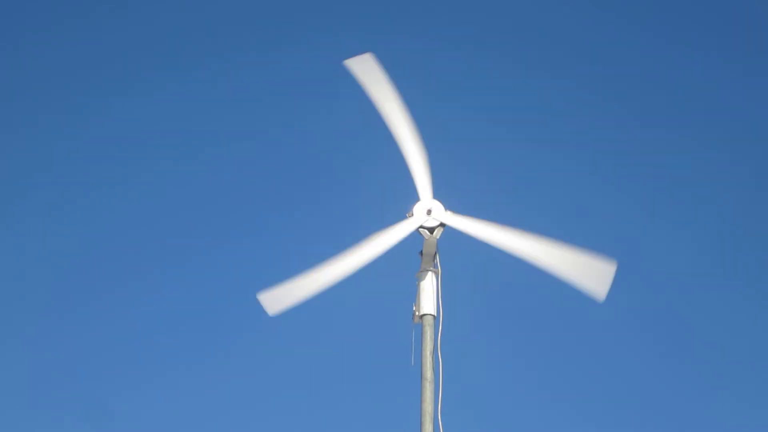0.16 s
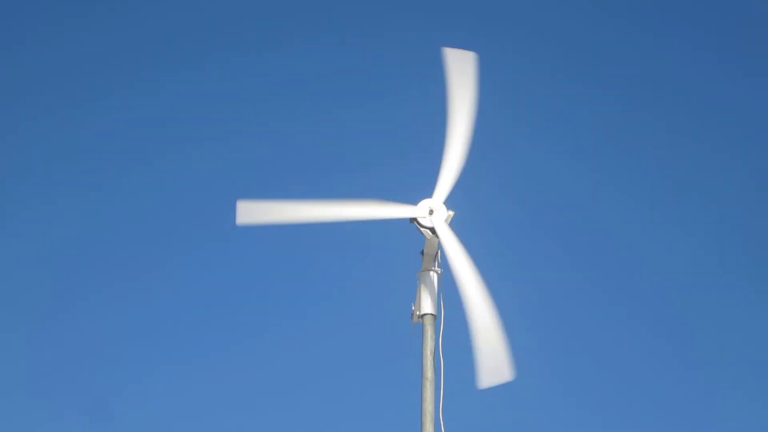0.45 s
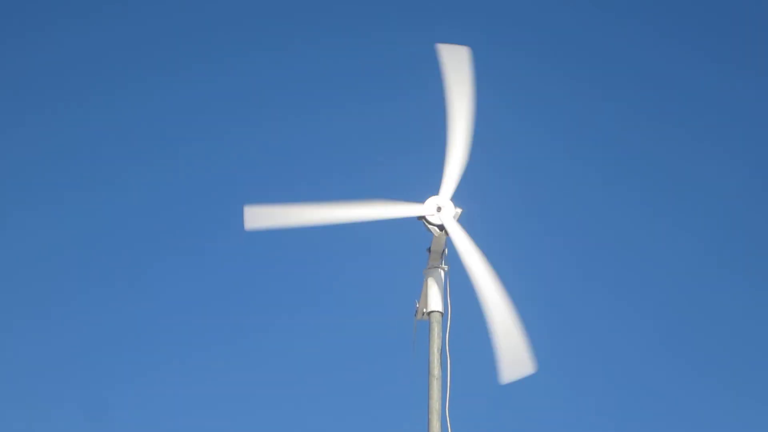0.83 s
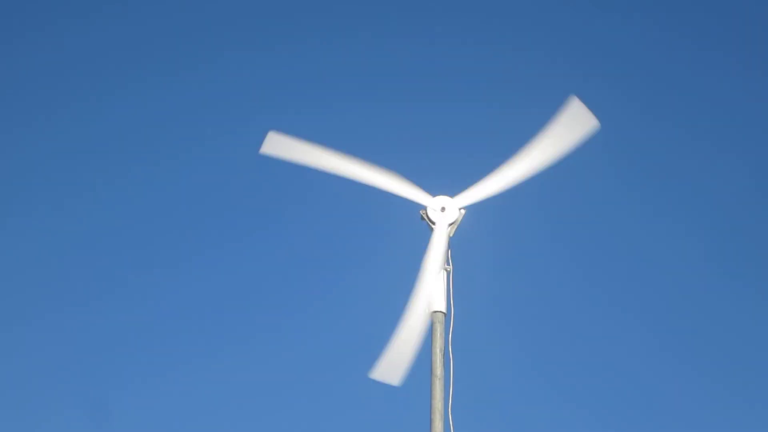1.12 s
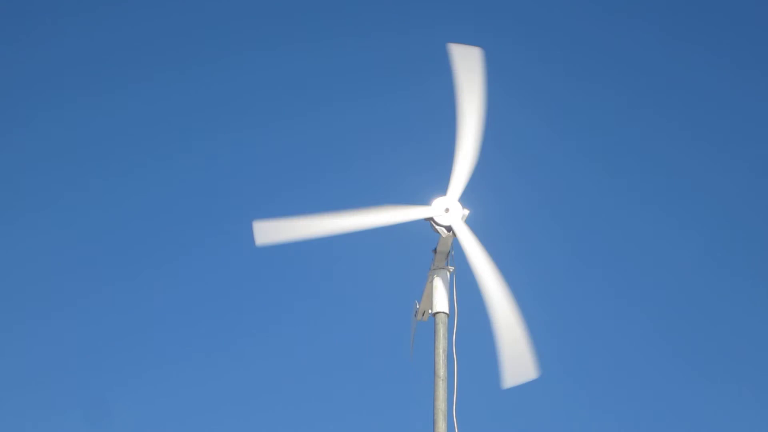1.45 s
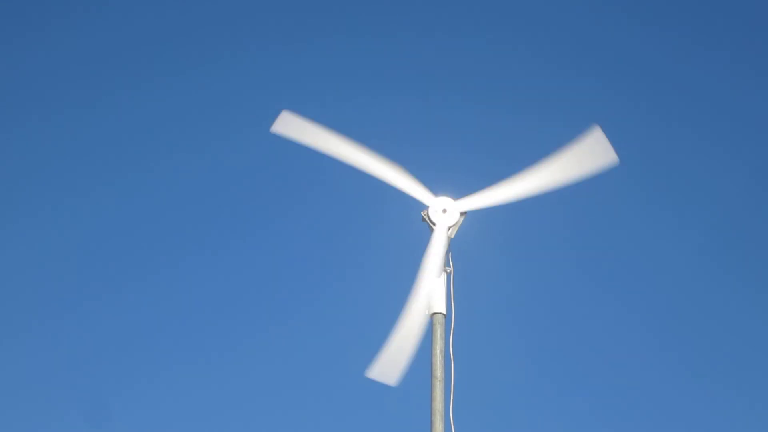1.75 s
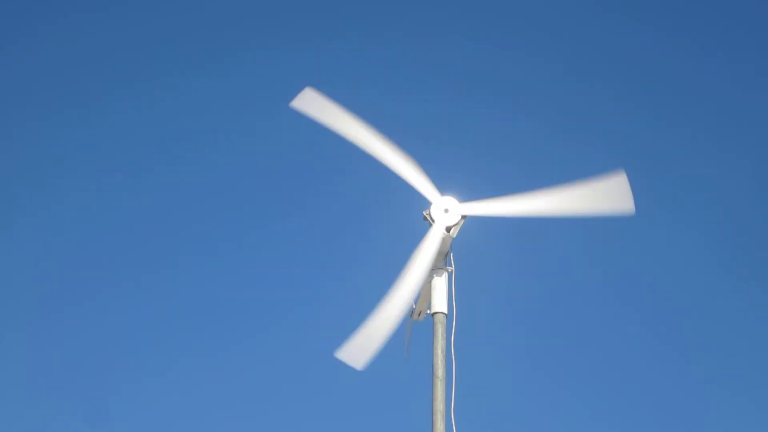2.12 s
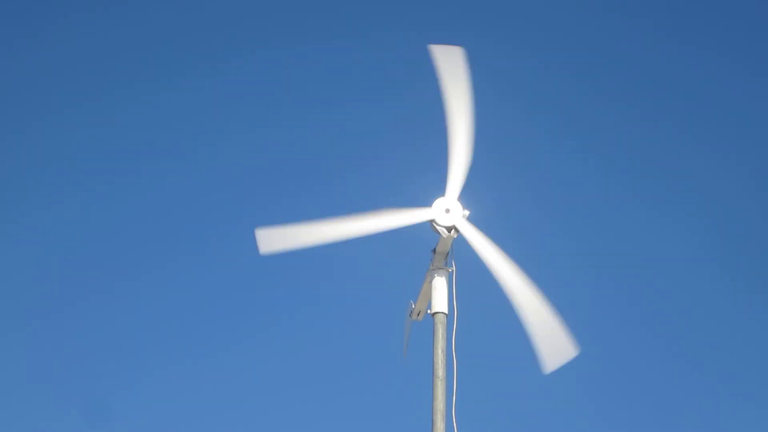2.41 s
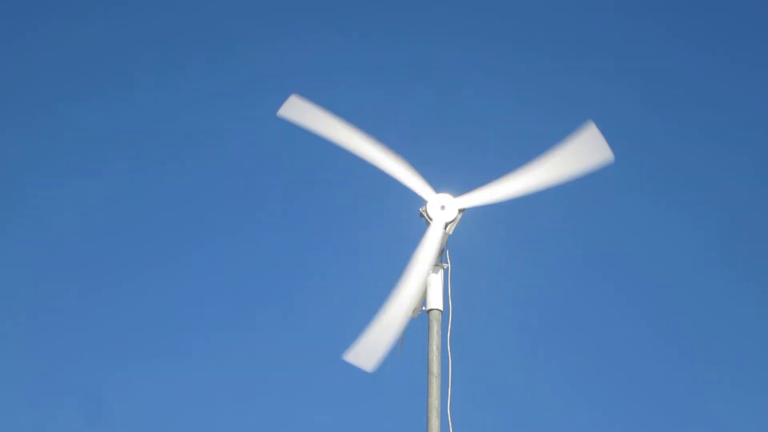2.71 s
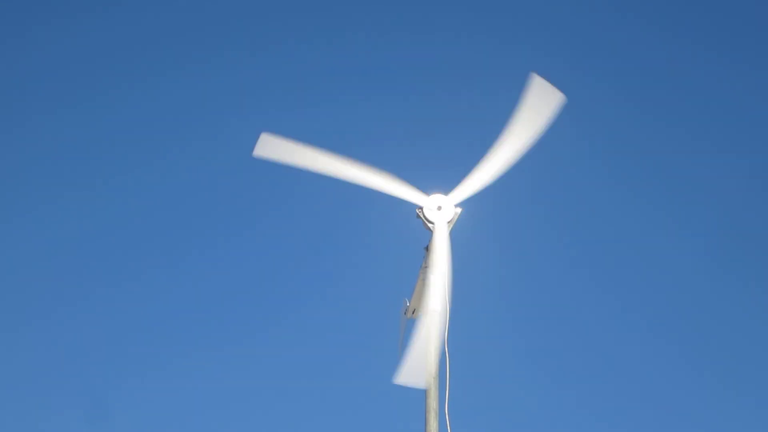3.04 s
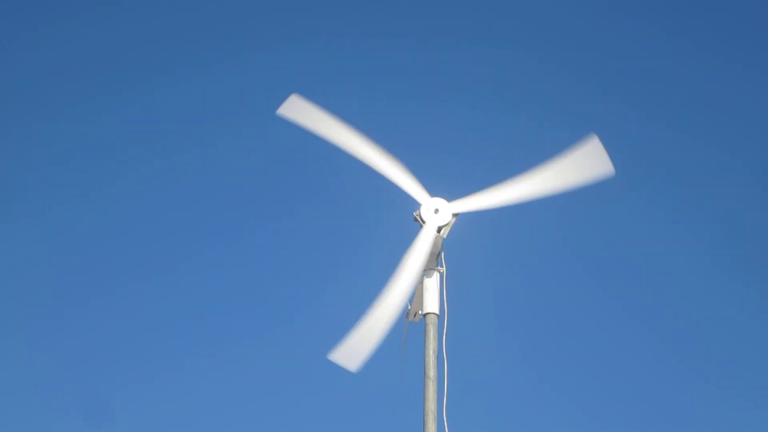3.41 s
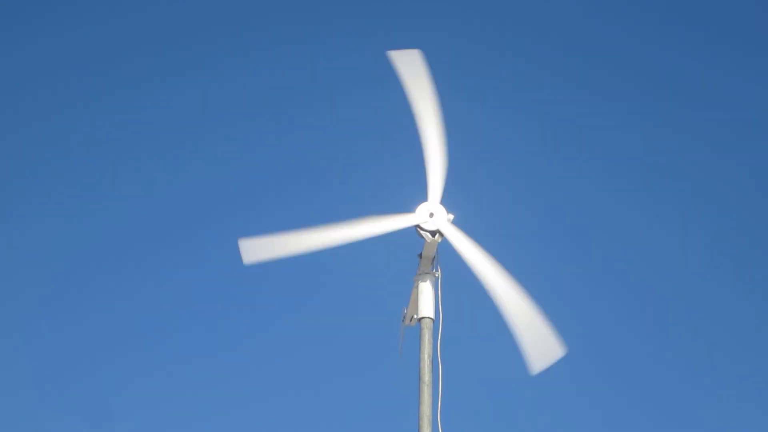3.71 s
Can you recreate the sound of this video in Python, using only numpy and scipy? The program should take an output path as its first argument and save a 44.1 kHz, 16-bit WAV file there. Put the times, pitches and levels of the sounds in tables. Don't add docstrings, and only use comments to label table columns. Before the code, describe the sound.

Gusty wind buffets a small outdoor microphone with low thumps, flutters and a steady airy hiss

```python
import sys
import numpy as np
from scipy import signal
from scipy.io import wavfile
from scipy.ndimage import uniform_filter1d

SR = 44100
rng = np.random.default_rng(int(sys.argv[2]) if len(sys.argv) > 2 else 0)


def voltage_ratio(level):
    return 10 ** (np.asarray(level, float) / 20)


def wrap_up_sound(samples):
    columns = np.atleast_2d(samples).T
    tamed = np.clip(columns, -1, 1)
    steps = np.round(tamed * 32767).astype(np.int16)
    wavfile.write(sys.argv[1], SR, steps)


N = 170226

# centre [t/s], peak [level/dB], [f/Hz]
SLAP_EDDIES = [(0.124, -27.5, 169), (0.153, -28.0, 151), (0.186, -26.0, 169), (0.198, -16.5, 236),
               (0.208, -21.5, 169), (0.21, -27.0, 295), (0.217, -18.0, 189), (0.223, -24.5, 330),
               (0.226, -20.0, 264), (0.251, -15.0, 189), (0.28, -25.5, 236), (0.301, -29.0, 189),
               (0.509, -12.5, 236), (0.525, -27.0, 151), (0.648, -26.0, 264), (0.652, -21.5, 295),
               (0.716, -22.5, 169), (0.723, -28.0, 151), (1.15, -23.5, 211), (1.184, -28.0, 236),
               (1.211, -27.0, 151), (1.275, -28.0, 189), (1.344, -26.0, 189), (1.351, -27.5, 189),
               (1.566, -20.5, 211), (1.834, -25.5, 151), (1.854, -28.0, 211), (1.858, -20.5, 211),
               (3.346, -28.0, 151), (3.371, -28.0, 189), (3.381, -22.5, 151), (3.395, -20.0, 151),
               (3.425, -17.5, 189), (3.427, -27.5, 330), (3.443, -12.0, 211), (3.455, -17.0, 264),
               (3.464, -26.5, 169), (3.472, -26.5, 295), (3.476, -23.0, 211), (3.484, -29.0, 151),
               (3.497, -16.0, 169), (3.503, -26.5, 169), (3.532, -19.5, 211), (3.603, -27.5, 236),
               (3.61, -21.5, 151), (3.711, -23.5, 236), (3.73, -26.5, 211), (3.734, -18.0, 295),
               (3.744, -24.0, 236), (3.757, -25.5, 169), (3.767, -24.5, 264), (3.827, -28.0, 189)]
# centre [t/s], peak [level/dB], [f/Hz]
FLUTTER_EDDIES = [(0.036, -27.5, 97), (0.169, -28.5, 87), (0.193, -21.5, 135), (0.226, -16.0, 121),
                  (0.249, -21.5, 108), (0.277, -18.0, 97), (0.303, -24.0, 108), (0.32, -27.5, 121),
                  (0.346, -28.0, 87), (0.515, -29.0, 135), (0.564, -28.5, 87), (0.588, -26.0, 135),
                  (0.607, -29.5, 87), (0.625, -25.0, 108), (0.636, -22.5, 108), (0.651, -18.0, 151),
                  (1.074, -30.0, 97), (1.137, -24.0, 135), (1.171, -28.5, 87), (1.196, -28.5, 135),
                  (1.224, -24.5, 108), (1.265, -30.0, 121), (1.283, -27.0, 108), (1.37, -23.5, 135),
                  (1.385, -28.0, 87), (1.426, -27.5, 121), (1.487, -28.5, 121), (1.529, -26.0, 135),
                  (1.559, -29.0, 135), (1.569, -25.0, 97), (1.751, -30.5, 87), (1.876, -29.0, 108),
                  (2.011, -27.5, 97), (2.334, -29.0, 121), (2.433, -28.5, 97), (2.914, -25.0, 87),
                  (3.079, -26.5, 135), (3.226, -25.0, 121), (3.277, -26.0, 121), (3.432, -26.0, 97),
                  (3.451, -9.5, 135), (3.534, -28.0, 97), (3.559, -27.5, 108), (3.587, -26.5, 87),
                  (3.639, -26.0, 121), (3.668, -29.5, 121), (3.677, -26.0, 135), (3.715, -18.0, 135),
                  (3.722, -25.0, 108), (3.735, -15.5, 108), (3.772, -23.0, 135), (3.784, -26.0, 108)]
# centre [t/s], peak [level/dB], [f/Hz]
THUMP_EDDIES = [(0.083, -31.0, 69), (0.127, -27.5, 40), (0.148, -19.0, 87), (0.201, -29.0, 69),
                (0.254, -27.5, 40), (0.258, -29.0, 69), (0.31, -32.0, 49), (0.432, -32.0, 55),
                (0.508, -29.0, 44), (0.66, -29.0, 69), (0.755, -30.0, 49), (0.804, -30.0, 77),
                (0.893, -22.5, 55), (1.054, -28.5, 55), (1.145, -30.0, 55), (1.221, -31.0, 49),
                (1.308, -31.0, 49), (1.47, -32.0, 49), (1.509, -31.0, 77), (1.533, -23.5, 49),
                (1.556, -29.0, 40), (1.605, -31.0, 55), (1.795, -29.5, 49), (1.903, -28.0, 55),
                (2.148, -30.0, 69), (2.182, -30.5, 49), (2.33, -31.0, 69), (2.672, -26.5, 77),
                (2.882, -23.5, 77), (2.944, -28.0, 55), (3.026, -29.5, 62), (3.242, -27.0, 44),
                (3.321, -30.0, 40), (3.327, -29.0, 69), (3.355, -27.0, 69), (3.369, -20.5, 87),
                (3.377, -32.5, 49), (3.391, -18.5, 77), (3.408, -24.0, 87), (3.428, -31.5, 44),
                (3.443, -18.0, 87), (3.451, -25.5, 40), (3.494, -30.0, 69), (3.522, -24.0, 87),
                (3.573, -31.0, 55), (3.637, -31.5, 44), (3.654, -25.5, 62), (3.715, -28.5, 49),
                (3.746, -25.0, 69), (3.768, -24.5, 49), (3.815, -30.0, 55), (3.839, -25.0, 62)]
# centre [t/s], peak [level/dB], [f/Hz]
SNAP_EDDIES = [(3.453, -29.5, 600), (3.7331, -27.5, 760), (3.799, -40, 1100), (3.682, -38, 1050),
               (3.469, -36, 820), (3.527, -34, 480), (1.8555, -35, 380), (3.628, -36, 420),
               (3.615, -36, 380), (1.4, -34, 330), (1.27, -34, 300)]
# [t/s], [level/dB]
WIND_STRENGTH = [(0.0, -44), (0.25, -38.5), (0.43, -42.5), (0.85, -42.5), (1.08, -42), (1.3, -41),
                 (1.5, -42), (1.7, -42), (1.9, -41.5), (2.1, -44), (2.35, -43.5), (2.7, -44), (2.87, -40),
                 (3.02, -41), (3.3, -43.5), (3.45, -37), (3.6, -39.5), (3.86, -40)]
# [f/Hz], [level/dB]
EDDY_SPECTRUM = [(22, -10), (40, -6), (70, -6), (110, -4), (170, -4), (260, -10.5), (420, -18)]
# [f/Hz], width [f/Hz], [level/dB]
CASE_MODES = [(2500, 300, -9), (6050, 600, -10), (3800, 260, -6), (4460, 300, 2.5), (5360, 390, -7.5),
              (7240, 420, -1.5), (8920, 600, -4), (10370, 650, -4), (11460, 480, -9), (13000, 800, -15),
              (14400, 900, -23), (15500, 900, -30)]
# [f/Hz], density [level/dB per Hz]
WASH_SPECTRUM = [(60, -2), (350, -3), (760, -1.5), (1150, -4.5), (2500, -16.5), (5000, -23.5), (10000, -31),
                 (16000, -40)]
# [f/Hz], width [f/Hz], lift [level/dB]
PORT_LIFTS = [(3460, 380, 1), (4580, 580, -1), (7200, 580, 0), (8830, 700, 0.5), (10300, 900, 0),
              (11700, 980, 0.5)]
# [f/Hz], width [f/Hz], rms [level/dB]
HUM_BANDS = [(745, 22, -65), (1794, 5, -72), (1841, 5, -75), (1964, 5, -76)]
# centre [t/s], width [t/s], rise [level/dB]
LOW_HUM_SWELL = (2.65, .35, 5)
# multiple of frame rate [1], rms [level/dB]
WHINE_SIDEBANDS = [(-7, -91), (-6, -91), (-5, -92), (-4, -88), (-3, -94), (-2, -86), (0.0, -79), (1, -80.5),
                   (3, -89), (5, -92), (6, -94)]
# [f/Hz], rms [level/dB]
STRAY_LINES = [(13194.7, -96), (13516.5, -97), (15734.3, -106)]
# centre [t/s], length [t/s], start [f/Hz], end [f/Hz], [level/dB]
BIRD_CHIRPS = [
    (.16, .06, 3600, 3300, -65),
    (.225, .05, 4600, 4300, -65),
    (.255, .06, 3400, 3200, -64.5),
    (1.15, .06, 3800, 3500, -65),
    (1.2, .045, 4600, 4000, -59),
    (1.222, .045, 3250, 3050, -62),
    (1.29, .07, 3700, 3400, -65.5),
    (1.38, .12, 3600, 3400, -66),
    (2.545, .06, 3650, 3150, -60.5),
    (3.77, .14, 3800, 3500, -66),
]

STRONG_CYCLES, STRONG_SHARP, SNAP_CYCLES = .5, .15, .75
LEAN_RAD, LEAN_CHANCE_RAD = 1.2, .15
EDDIES_PER_S, EDDY_SPREAD_DB, EDDY_CYCLES, EDDY_DB = 1500, 1.6, .8, 5
BRIGHTEN_PER_OCTAVE = .2
TICK_S, TICK_DB, TICK_SCRAPE_S = .0837, -23, .0011
BOUNCE_S, BOUNCE_DB, BOUNCE_HZ, BOUNCE_WIDTH_HZ = .004, -14, 4900, 1500
WASH_DB, PATCH_DB, SWELL_DB = -47.5, .56, -.27
WHINE_HZ, FRAME_HZ = 7852.1, 30.0
BIRD_WIDTH_HZ = 1000
CEILING, EDGE_HZ = .5, 15750


def evened(x):
    return x / np.sqrt(np.mean(x ** 2) + 1e-20)


def add(mix, start_s, sound):
    part = mix[max(round(start_s * SR), 0):][:len(sound)]
    part += sound[:len(part)]


def resonate(x, hz, width_hz):
    turn = np.exp(2j * np.pi * np.cumsum(hz * np.ones(len(x))) / SR)
    r = np.exp(-np.pi * width_hz / SR)
    return 2 * (turn * signal.lfilter([1 - r], [1, -r], x / turn + 1e-18)).real


def eddy(hz, cycles, sharp=0., lean=0.):
    half = round(2 * SR / hz)
    u = np.arange(-half, half) * hz / SR
    bell = np.exp(-.5 * (u / cycles) ** 2)
    phase = 2 * np.pi * u + lean
    wave = np.cos(phase) + sharp * np.cos(2 * phase)
    return bell * (wave - (bell * wave).sum() / bell.sum())


def buffets(rows, cycles, sharp):
    out = np.zeros(N)
    chance = rng.uniform(-1, 1, len(rows))
    for (centre_s, db, hz), c in zip(rows, chance):
        pulse = eddy(hz, cycles, sharp, LEAN_RAD + LEAN_CHANCE_RAD * c)
        add(out, centre_s - 2 / hz, voltage_ratio(db) * pulse)
    return out


def rumble():
    strength_db = np.interp(np.arange(N) / SR, *np.transpose(WIND_STRENGTH))
    gust_db = strength_db - strength_db.mean()
    size = voltage_ratio(EDDY_SPREAD_DB * np.minimum(rng.exponential(1, N), 4))
    size = size * (rng.random(N) < EDDIES_PER_S / SR)
    f, db = np.transpose(EDDY_SPECTRUM)
    sizes_hz = np.geomspace(f[0], f[-1], num=28)
    kind = rng.integers(0, len(sizes_hz), N)
    lean = rng.uniform(0, 2 * np.pi, len(sizes_hz))
    out = np.zeros(N)
    for k, hz in enumerate(sizes_hz):
        pulse = eddy(hz, EDDY_CYCLES, lean=lean[k]) * np.sqrt(hz / f[-1])
        level_db = np.interp(np.log(hz), np.log(f), db)
        level_db = level_db + BRIGHTEN_PER_OCTAVE * np.log2(hz / 80) * gust_db
        out += voltage_ratio(level_db) * signal.oaconvolve(size * (kind == k), pulse, "same")
    return voltage_ratio(strength_db + EDDY_DB) * evened(out)


def tick():
    t = np.arange(900) / SR
    push = np.sin(np.pi / 2 * np.minimum(t / .00025, 1)) ** 2
    ring = np.zeros(len(t))
    for hz, width_hz, db in CASE_MODES:
        decay = np.exp(-np.pi * width_hz * np.maximum(t - TICK_SCRAPE_S, 0))
        mode = np.sin(2 * np.pi * (hz * t + rng.random()))
        ring += voltage_ratio(db) * np.sqrt(width_hz) * decay * mode
    snap = voltage_ratio(TICK_DB) * push * ring / abs(push * ring).max()
    bounce = resonate(snap, BOUNCE_HZ, BOUNCE_WIDTH_HZ)
    bounce = resonate(bounce, BOUNCE_HZ, BOUNCE_WIDTH_HZ)
    out = np.zeros(N)
    add(out, TICK_S, snap)
    add(out, TICK_S + BOUNCE_S, voltage_ratio(BOUNCE_DB) * bounce)
    return out


def wash():
    frames = N // 256 + 5
    hz = np.fft.rfftfreq(1024, 1 / SR)
    a, b, patches = rng.standard_normal((frames, 513, 3)).T
    patches = uniform_filter1d(patches, size=14, axis=0)
    patches = evened(uniform_filter1d(patches, size=12, axis=1))
    t = np.arange(frames) * 256 / SR
    swell = np.zeros(frames)
    for f in np.geomspace(.3, 12, num=24):
        swell += np.sin(2 * np.pi * (f * t + rng.random())) / np.sqrt(f)
    f, db = np.transpose(WASH_SPECTRUM)
    colour_db = np.interp(np.log(hz + 1), np.log(f), db)
    for centre_hz, width_hz, lift_db in PORT_LIFTS:
        colour_db += lift_db * np.exp(-.5 * ((hz - centre_hz) / width_hz * 2) ** 2)
    level_db = colour_db[:, None] + PATCH_DB * patches + SWELL_DB * evened(swell)
    air = signal.istft((a + 1j * b) * voltage_ratio(level_db), nperseg=1024, noverlap=768)[1][:N]
    return voltage_ratio(WASH_DB) * evened(air)


def generator_hum():
    t = np.arange(N) / SR
    bands = [voltage_ratio(db) * evened(resonate(rng.standard_normal(N), hz, width_hz))
             for hz, width_hz, db in HUM_BANDS]
    centre_s, width_s, rise_db = LOW_HUM_SWELL
    swell_db = rise_db * np.exp(-((t - centre_s) / width_s) ** 2) - 1.5
    return voltage_ratio(swell_db) * bands[0] + sum(bands[1:])


def camera_whine():
    t = np.arange(N) / SR
    lines = [(WHINE_HZ + k * FRAME_HZ, db) for k, db in WHINE_SIDEBANDS] + list(STRAY_LINES)
    out = np.zeros(N)
    for hz, db in lines:
        out += voltage_ratio(db) * np.sqrt(2) * np.sin(2 * np.pi * (hz * t + rng.random()))
    return out


def birds():
    out = np.zeros(N)
    for centre_s, length_s, start_hz, end_hz, db in BIRD_CHIRPS:
        n = round(length_s * SR)
        hz = np.linspace(start_hz, end_hz, n)
        air = rng.standard_normal(8000)[:n]
        whistle = resonate(air, hz, BIRD_WIDTH_HZ)
        whistle = evened(resonate(whistle, hz, BIRD_WIDTH_HZ))
        add(out, centre_s - length_s / 2, voltage_ratio(db) * np.hanning(n) * whistle)
    return out


def scene():
    wind = rumble()
    wind += buffets(SLAP_EDDIES, STRONG_CYCLES, STRONG_SHARP)
    wind += buffets(THUMP_EDDIES, STRONG_CYCLES, STRONG_SHARP)
    behind = wash() + tick() + generator_hum() + camera_whine() + birds()
    wind += buffets(SNAP_EDDIES, SNAP_CYCLES, 0)
    wind += buffets(FLUTTER_EDDIES, STRONG_CYCLES, STRONG_SHARP)
    return (wind + behind)[None]


def roll_off(x):
    return signal.sosfilt(signal.butter(12, 16180, fs=SR, output="sos"), x)


def record(dry):
    rounded = dry / (1 + (abs(dry) / CEILING) ** 4) ** .25
    lowpass = signal.firwin(4095, EDGE_HZ, window=("kaiser", 5), fs=SR)
    limited = signal.oaconvolve(rounded, lowpass[None], "same")
    return roll_off(limited)


dry = scene()
out = record(dry)
wrap_up_sound(out)
```